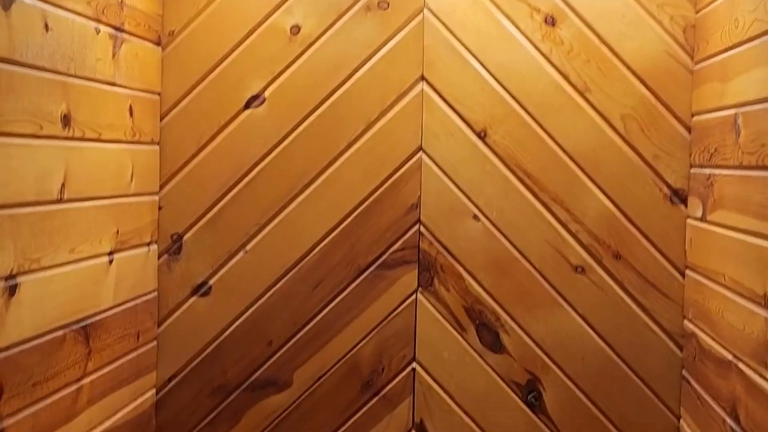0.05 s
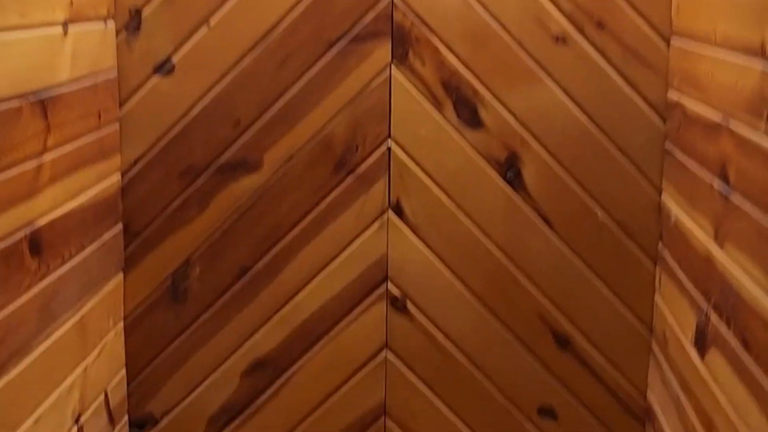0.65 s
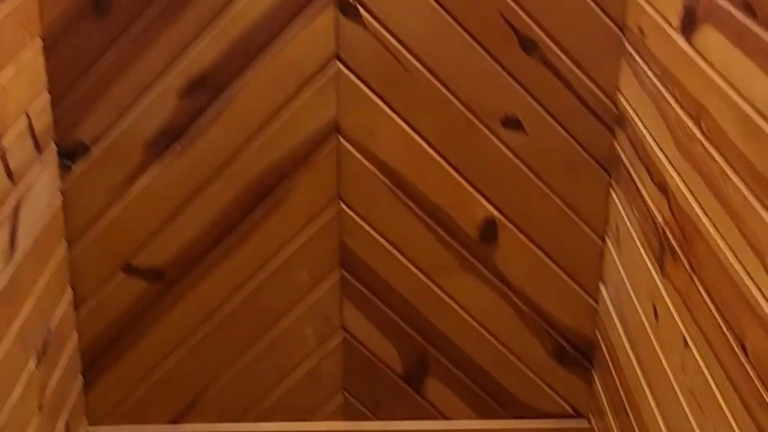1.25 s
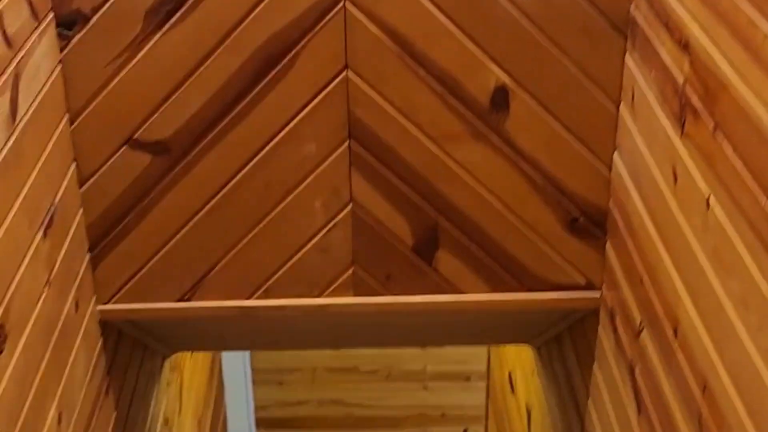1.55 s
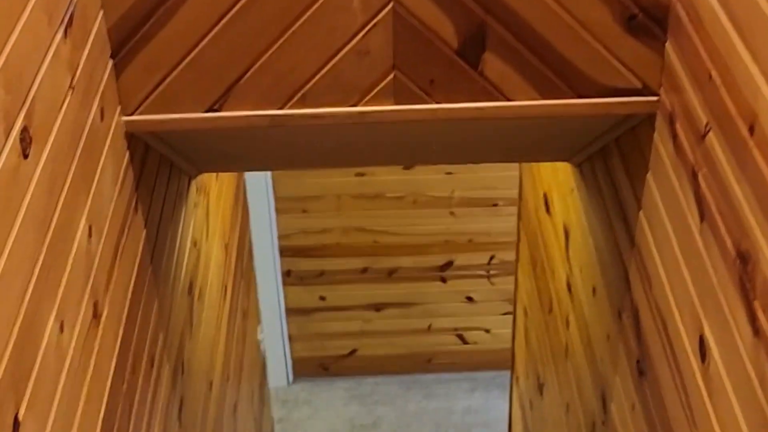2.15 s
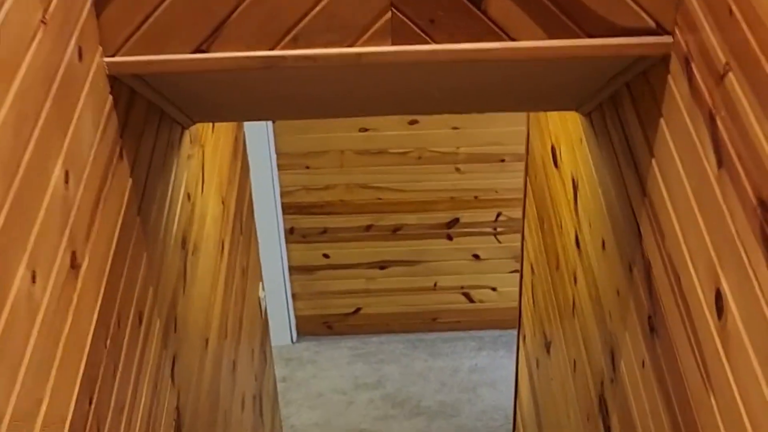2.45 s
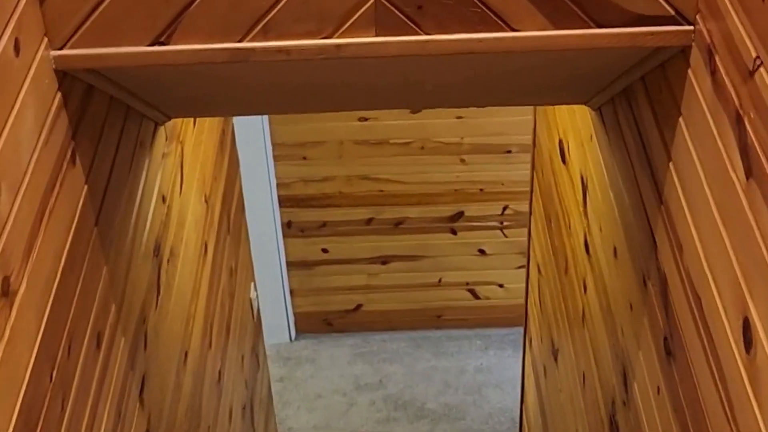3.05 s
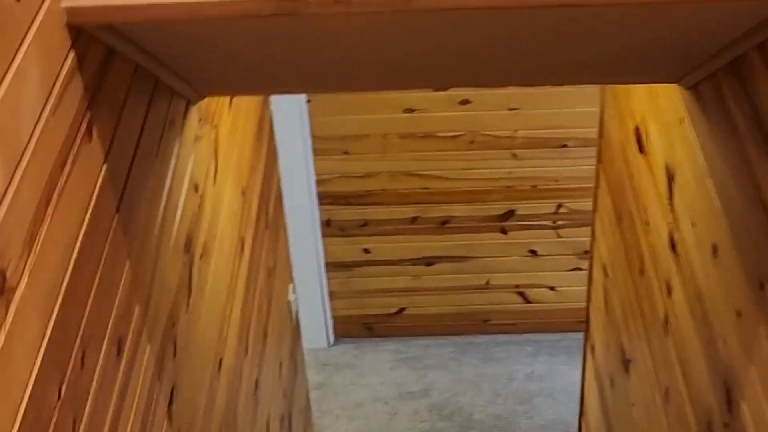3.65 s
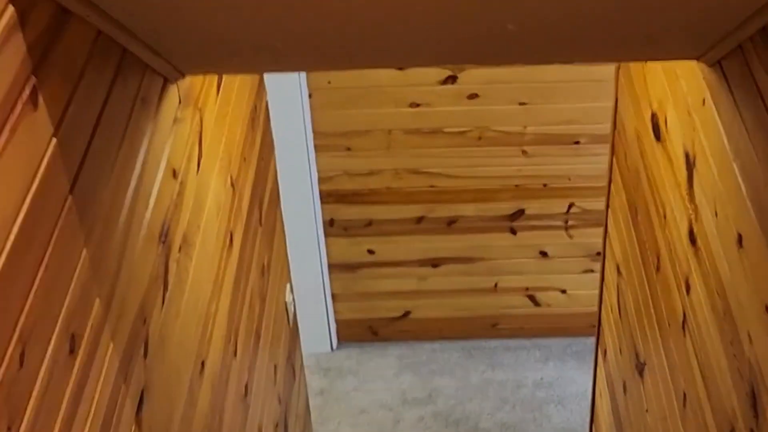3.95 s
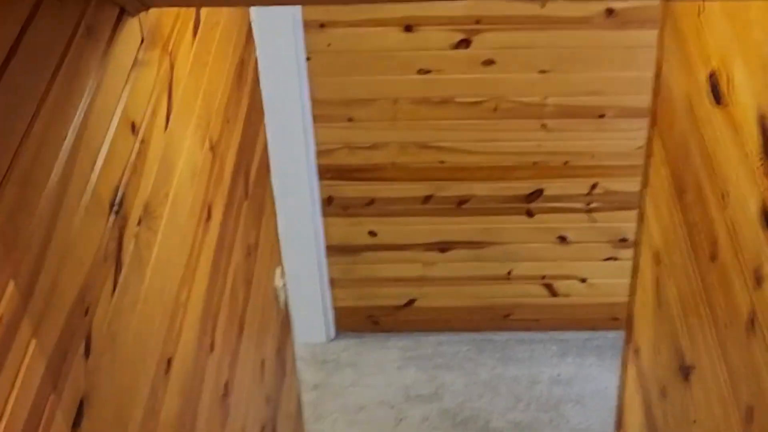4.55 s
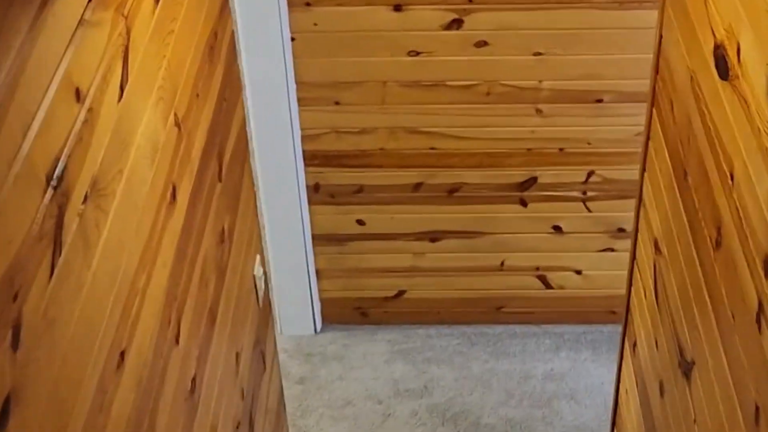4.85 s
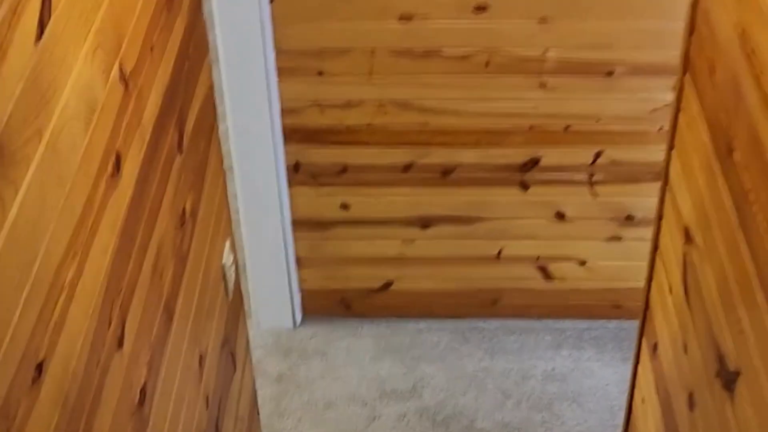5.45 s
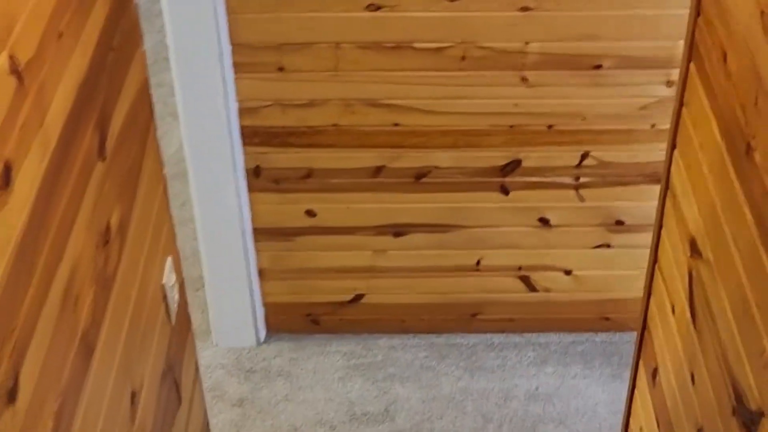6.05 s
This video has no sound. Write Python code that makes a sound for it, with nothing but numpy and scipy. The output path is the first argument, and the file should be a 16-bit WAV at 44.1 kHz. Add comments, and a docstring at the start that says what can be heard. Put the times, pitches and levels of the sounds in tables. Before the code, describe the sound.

Footsteps go down a carpeted wooden staircase in a narrow indoor stairwell, each a low, hollow thud. The first steps are soft and widely spaced, with a few sharp cracks from the boards. Then the steps become heavier and closer together, with light sole scuffs and clothing swishing near the hand-held microphone. A faint low house rumble lies underneath.

```python
"""Footsteps descend a carpeted wooden staircase in a narrow pine-panelled stairwell.
Each impact of heel or toe excites the damped modes of the hollow treads, and soles scuff the carpet.
On the upper steps dry joints slip and crack, the boards resonating and the walls reflecting the sound.
Friction makes clothing swish close to a hand-held phone, over the low rumble of the house."""
import sys
import numpy as np
from scipy import signal
from scipy.fft import rfft, irfft
from scipy.io import wavfile
from scipy.ndimage import uniform_filter1d

SR = 44100
rng = np.random.default_rng(int(sys.argv[2]) if len(sys.argv) > 2 else 0)


def persist_wave(psi):
    """Save psi, clipped to +-1, as 16-bit WAV."""
    counts = np.round(np.clip(psi, -1, 1) * 32767).astype(np.int16)
    wavfile.write(sys.argv[1], SR, np.atleast_2d(counts).T)


N = 277389
TIME = np.arange(N) / SR
AGE = TIME[:SR]  # seconds since an impact

# Levels in the tables are relative: each source adds its own gain.
# footfalls: start_s, thump_db, boom_hz, knock_db, slap_db
FOOTFALLS = [(1.085, -23.5, 92.3, -37.5, -65), (1.83, -37, 127, -46.5, -67), (2.454, -24, 89.7, -34, -55.5),
             (3.142, -32, 115.4, -37.5, -79), (3.273, -19.5, 109.6, -28, -33.5), (3.734, -30, 77, -34, -50),
             (3.775, -41, 108, -33.5, -42.5), (3.805, -25.5, 91.3, -32.5, -48),
             (3.877, -24.5, 92.4, -46, -47), (4.242, -31, 126, -38.5, -47),
             (4.263, -19.5, 107.4, -31, -46.5), (4.377, -22.5, 81, -30.5, -39),
             (4.433, -11, 107.2, -29, -39.5), (4.663, -10.5, 92.6, -21.5, -29),
             (4.816, -25.5, 87.7, -35, -38), (4.961, -33.5, 77, -49, -60), (5.087, -29, 77.5, -39.5, -73),
             (5.218, -28, 74, -42.5, -64), (5.293, -22.5, 70.4, -36, -40.5), (5.356, -19, 72, -32.5, -49),
             (5.602, -12, 101, -23, -32), (5.733, -20.5, 98.6, -27, -34.5), (6.106, -26, 77, -36.5, -62),
             (6.214, -22, 73.5, -66, -60), (6.254, -28.5, 65, -38, -46.5)]
# modes of the hollow staircase: pitch_hz, level_db, t60_s
FRAME_MODES = [(131.9, -5.5, 0.65), (165.6, 0.5, 0.42), (201.5, -3.5, 0.44), (254.6, -4, 0.3),
               (349.6, -7.5, 0.081), (381.5, -6.5, 0.28), (414, -6.5, 0.39), (469, -9, 0.3),
               (550, -12.5, 0.17), (630, -18, 0.49), (787, -10, 0.13)]
# bending modes of the whole flight: pitch_hz, level_db, t60_s
FLIGHT_MODES = [(34, 3, 0.28), (48.2, -4, 0.49), (63.8, 6.5, 0.5)]
# spectrum of the reverberant knock: frequency_hz, level_db
KNOCK_SPECTRUM = [(70, -6.5), (130, 8), (250, 0), (310, -5), (400, -9.5), (550, -9.5), (800, -16),
                  (1300, -32.5), (4000, -54)]
# spectrum of a sole's slap: frequency_hz, level_db
SLAP_SPECTRUM = [(250, -10), (700, 2), (1200, 0.5), (2100, -7.5), (3200, -14), (6000, -18.5), (14000, -41)]
# timber cracks: start_s, level_db, left_minus_right_db, ring_db, echo_db, body_db, bite_db, crisp_db
TIMBER_CRACKS = [(0.343, -48, -3, -17, -1, 0, 0, -21), (0.649, -22, -13.5, -4, -2, -2, 2, -0.5),
                 (0.914, -42.5, -9, -8, 9, 2.5, -7.5, -24), (1.687, -27, -13.5, -32, 0, -16, 4, 0.5),
                 (1.7553, -14, -9, -17, -8.5, -7, 7.5, 0.5), (2.6876, -9.5, -5, 0.5, 3, 6, -3, -7),
                 (2.6922, -25.5, -14, 5, -18, 8, 1, 10.5)]
# resonances of a cracking board: pitch_hz, bandwidth_hz, level_db
BOARD_MODES = [(354, 30, 6), (902, 25, 5), (952, 20, 9), (1009, 20, 5), (2058, 25, 8), (2205, 70, 12),
               (2270, 8, 5), (2828, 25, 6), (3694, 35, 7), (6413, 35, 3), (6789, 35, 3), (8559, 60, 6),
               (11528, 200, 6), (12292, 60, 5)]
# spectrum of a slipping joint: frequency_hz, level_db
SNAP_SPECTRUM = [(300, -11), (1200, -17), (2100, -1), (3000, -25.5), (5000, -8.5), (6600, 3.5), (7600, 2),
                 (9000, -10.5), (11500, -3), (15000, -0.5), (17000, 2.5)]
# spectrum of its wall reflections: frequency_hz, level_db
ECHO_SPECTRUM = [(150, -4), (350, -1), (900, -4), (1400, 0), (2200, -1), (2700, -3.5), (3700, 0.5),
                 (4800, 0), (6600, 3.5), (8000, -7), (9700, -8.5), (11500, -4), (15000, -1.5), (17000, -22)]
# soles brushing the carpet: start_s, level_db, rise_s, centre_hz
SOLE_SCUFFS = [(0.342, -56, 0.0016, 1370), (1.169, -59, 0.018, 3460), (1.395, -54.5, 0.007, 367),
               (1.529, -56, 0.064, 597), (1.742, -43, 0.0078, 385), (2.219, -51, 0.0013, 1510),
               (2.294, -43, 0.012, 453), (2.579, -48, 0.009, 800), (3.229, -47, 0.0098, 1800),
               (4.243, -40, 0.0032, 690), (4.816, -43, 0.0014, 780), (5.585, -40, 0.0093, 570),
               (6.074, -45, 0.0027, 614), (6.120, -41, 0.0018, 790), (6.153, -48, 0.0049, 2080)]
# swishes of clothing: fastest_s, swell_s, fall_s, rub_db, hiss_db
CLOTH_SWISHES = [(0.2, 0.016, 0.22, -68.5, -69.5), (0.51, 0.07, .1, -79, -82),
                 (1.16, 0.12, 0.095, -63, -69), (1.525, 0.024, 0.04, -60, -63),
                 (1.86, 0.29, 0.23, -59.5, -70), (2.048, .045, 0.048, -57.5, -55.5),
                 (2.28, 0.037, .11, -66.5, -66), (2.53, 0.13, 0.17, -58.5, -51.5),
                 (3.0, 0.6, 0.13, -57, -56.5), (3.25, 0.21, 0.21, -54, -46.5),
                 (3.77, .22, 0.16, -54.5, -45), (4.34, 0.17, 0.27, -54.5, -43.5),
                 (4.76, 0.19, 0.17, -54.5, -45.5), (5.33, 0.18, 0.16, -55, -44),
                 (5.75, 0.23, 0.14, -51.5, -46), (6.28, 0.16, .15, -56, -48)]
# soft rub that goes on between swishes: time_s, level_db
RESTING_RUB = [(.15, -82.5), (.7, -72.5), (2.3, -70), (3.5, -71.5), (4.1, -56), (5.05, -63), (6.1, -60)]
# spectrum of rubbing fabric: frequency_hz, level_db
RUB_SPECTRUM = [(200, -4.5), (310, -4), (420, 3), (700, -7.5), (1200, -8.5), (1700, -8.5), (2200, -8),
                (2800, -13), (4600, -12), (6400, -7.5), (7500, -14.5), (9500, -44), (12000, -29),
                (16000, -44)]
# spectrum of its fine hiss: frequency_hz, level_db
HISS_SPECTRUM = [(2000, -14), (7000, -4.5), (9700, -12), (11500, -1.5), (13500, -3), (15300, 0.5),
                 (16200, -20)]
# low shudder of the staircase and the carried phone: time_s, level_db
SHUDDER_LEVELS = [(0, -59), (.9, -58), (1.2, -49.5), (1.8, -50), (3.9, -50.5), (5.3, -43), (6.29, -40)]
# spectrum of that shudder: frequency_hz, level_db
SHUDDER_SPECTRUM = [(20, -0.5), (45, -0.5), (60, -6), (78, -8), (105, 8), (160, -7.5), (260, -19.5),
                    (450, -27), (900, -53.5)]
# spectrum of the house rumble: frequency_hz, level_db
HOUSE_SPECTRUM = [(20, -17), (40, -5), (58, 1), (78, -12), (103, -1), (134, -6), (200, -21), (300, -23),
                  (700, -38.5), (2100, -37), (2600, -56), (6300, -44.5), (9000, -74), (16000, -62)]
# stereo width between the two microphone ports: frequency_hz, side_minus_mid_db
STEREO_WIDTH = [(60, -18), (125, -19.5), (250, -9), (500, -5.5), (1200, 3), (2400, -1), (5000, 1),
                (8000, -3.5), (15000, -17.5)]


def footsteps():
    """Impact excitation: a foot sets tread, flight and hollow frame vibrating in their normal modes."""
    out = np.zeros((2, N))
    for start_s, thump_db, boom_hz, sag_db, knock_db, slap_db in impacts():
        # a hard contact slaps louder and reaches higher modes than a soft one
        tilt_db = 0.22 * (slap_db - knock_db + 14.5)
        tread = -undb(thump_db + 4.5) * mode(boom_hz, t60=0.18, rise=0.014)
        sag = undb(sag_db) * struck_modes(FLIGHT_MODES, rise=0.0088)
        frame = undb(knock_db - 3.5) * struck_modes(FRAME_MODES, rise=0.0017, tilt_db=tilt_db)
        slap = undb(slap_db + 10.5) * noise(SLAP_SPECTRUM)[0] * fade(t60=0.016, rise=0.00067)
        # reverberation arrives from all sides and lasts longer in the bass
        low_echo = undb(knock_db) * noise(KNOCK_SPECTRUM, tilt_db=tilt_db) * fade(t60=0.34, rise=0.0023)
        high_echo = undb(slap_db - 0.5) * noise(SLAP_SPECTRUM) * fade(t60=0.21, rise=0.0018)
        add(out, start_s, from_below(tread + sag + frame + slap) + low_echo + high_echo)
    return out


def impacts(settle_s=0.058, light_touch_db=-32.5, usual_thump_db=-24.5):
    """Weight transfer: each footfall bends the flight, and all but the lightest settle with a bump."""
    settle_thump_db, settle_knock_db, settle_slap_db = -31, -46, -68
    for start_s, thump_db, boom_hz, knock_db, slap_db in FOOTFALLS:
        shudder_db = np.interp(start_s, *np.transpose(SHUDDER_LEVELS))
        sag_db = shudder_db + 2.5 + 0.22 * (thump_db - usual_thump_db)
        yield start_s, thump_db, boom_hz, sag_db, knock_db, slap_db
        bump_s = start_s + settle_s
        if bump_s < TIME[-1] and thump_db > light_touch_db:
            yield bump_s, settle_thump_db, boom_hz, sag_db + 2.5, settle_knock_db, settle_slap_db


def struck_modes(modes, rise, tilt_db=0):
    """Modal superposition: a random striking point varies each mode; tilt_db is per octave."""
    out = np.zeros(SR)
    for hz, db, t60 in modes:
        share, shift = rng.standard_normal(2)
        gain = undb(db + 1.36 * share + tilt_db * np.log2(hz / 280))
        out += gain * np.sign(shift) * mode(hz * (1 + 0.0092 * shift), t60, rise)
    return out


def from_below(sound, lag_s=0.00045):
    """Path difference: sound from the feet reaches the left microphone port later than the right."""
    delayed = np.interp(AGE - lag_s, AGE, sound, left=0)
    return np.array([delayed, sound]) * pan(0.23)


def timber_cracks():
    """Stick-slip: a joint lets go with a snap, followed by dense reflections between the walls."""
    out = np.zeros((2, N))
    for start_s, level_db, pan_db, ring_db, echo_db, body_db, bite_db, crisp_db in TIMBER_CRACKS:
        snap = noise(SNAP_SPECTRUM)
        snap *= fade(t60=0.0064, rise=0.00081) + 0.052 * fade(t60=0.092, rise=0.00096)
        echo = noise(ECHO_SPECTRUM)
        echo *= fade(t60=0.12, rise=0.015) + 0.25 * fade(t60=0.38, rise=0.0077)
        crack = undb(8.5) * snap * pan(pan_db) + undb(echo_db - 6.5) * echo * pan(0.15 * pan_db)
        coloured = board_resonance(crack, ring_db, body_db, bite_db, crisp_db)
        add(out, start_s, undb(level_db) * coloured[:, :SR // 2])
    return out


def board_resonance(sound, ring_db, body_db, bite_db, crisp_db):
    """Resonant filtering by a board; a longer slip has more body, a faster one more bite and top."""
    bin_hz = np.arange(SR // 2 + 1)
    peaks = sum(undb(db + ring_db) / (1 + 2j * (bin_hz - hz) / width) for hz, width, db in BOARD_MODES)
    slip_tone = gains([(400, 0.0035), (800, body_db), (1500, 0), (4800, 0), (6800, bite_db),
                       (8300, 0), (11500, crisp_db)], size=SR)
    return irfft(rfft(sound) * (1 + peaks) * slip_tone, SR)


def scuffs():
    """Sliding friction: a sole on carpet gives a pulse of band noise with a faint reverberant tail."""
    out = np.zeros((2, N))
    for start_s, level_db, rise, hz in SOLE_SCUFFS:
        rub = noise([(hz / 4, -24), (hz, 0), (hz * 4, -27), (hz * 16, -55)])
        pulse = AGE / rise * np.exp(1 - AGE / rise)
        tail = 0.14 * fade(t60=0.37, rise=rise)
        add(out, start_s, undb(level_db) * rub * (pulse + tail))
    return out


def clothing():
    """Friction noise: fabric rubs on fabric, grainy from the weave and hissing when it slides fast."""
    rub_gain, hiss_gain = sliding_gains()
    rub = undb(6) * rub_gain * noise(RUB_SPECTRUM, size=N) * pan(-0.47)
    hiss = undb(-2.5) * hiss_gain * noise(HISS_SPECTRUM, size=N) * pan(-3.5)
    grain = undb(0.55 * wander(rate_hz=35) + 1.07 * wander(rate_hz=400))
    return grain * (rub + hiss)


def sliding_gains(steepness=2.41):
    """Incoherent addition: swishes sum in power, the amplitude of each following its sliding speed."""
    rest = undb(np.interp(TIME, *np.transpose(RESTING_RUB)))
    rub_power, hiss_power = rest ** 2, (rest * undb(-24)) ** 2
    for fastest_s, swell_s, fall_s, rub_db, hiss_db in CLOTH_SWISHES:
        from_peak = np.maximum((fastest_s - TIME) / swell_s, (TIME - fastest_s) / fall_s)
        speed = np.exp(-from_peak.clip(0, 10) ** steepness)  # a bell with a flattened top
        rub_power += (undb(rub_db) * speed) ** 2
        hiss_power += (undb(hiss_db) * speed) ** 2
    return np.sqrt([rub_power, hiss_power])


def house_rumble(rumble_db=-55):
    """Structure-borne noise: a steady rumble, and an uneven shudder that grows on the lower flight."""
    shudder_db = np.interp(TIME, *np.transpose(SHUDDER_LEVELS)) + 2 * wander(rate_hz=12)
    shudder = undb(shudder_db) * noise(SHUDDER_SPECTRUM, size=N)
    return undb(rumble_db) * noise(HOUSE_SPECTRUM, size=N) + shudder


def mode(hz, t60, rise):
    """Damped oscillation at one natural frequency."""
    return np.sin(2 * np.pi * hz * AGE) * fade(t60, rise)


def fade(t60, rise):
    """Exponential decay of 60 dB in t60 seconds, with an onset time constant of rise seconds."""
    return (1 - np.exp(-AGE / rise)) * undb(-60 * AGE / t60)


def noise(spectrum, size=SR, tilt_db=0):
    """Partial coherence: coloured stereo noise of rms 1, alike in the bass; tilt_db is per octave."""
    mid, side = rfft(rng.standard_normal((2, size)))
    width = gains(STEREO_WIDTH, size)
    octaves = np.log2((np.arange(size // 2 + 1) * SR / size + 20) / 4000)
    pair = (mid + np.array([[1], [-1]]) * width * side) / np.hypot(1, width)
    coloured = irfft(pair * gains(spectrum, size) * undb(tilt_db * octaves), size)
    return coloured / np.sqrt(np.mean(coloured ** 2))


def gains(spectrum, size):
    """Spectral envelope: the gain at each transform bin, interpolated over log frequency."""
    hz, db = np.transpose(spectrum)
    bin_hz = np.arange(size // 2 + 1) * SR / size
    return undb(np.interp(np.log(bin_hz + 1), np.log(hz), db))


def wander(rate_hz):
    """Random modulation, smoothed, with a spread near 1."""
    hold = int(SR / rate_hz)
    held = np.repeat(rng.standard_normal(N // hold + 1), hold)
    return uniform_filter1d(held, hold)[:N]


def pan(db):
    """Level difference, left minus right, as a pair of gains."""
    return undb(np.array([[db], [-db]]) / 2)


def undb(db):
    """Amplitude ratio of a level in decibels."""
    return 10 ** (np.asarray(db) / 20)


def add(out, start_s, sound):
    """Superposition of a sound on the mix from start_s."""
    i = int(start_s * SR)
    out[:, i:i + sound.shape[1]] += sound[:, :N - i]


def scene():
    """Linear superposition of all sources in the stairwell."""
    return footsteps() + timber_cracks() + scuffs() + clothing() + house_rumble()


def record(dry):
    """Band limiting: the phone cuts the top with a steep low-pass filter."""
    cutoff_hz = 15850
    return signal.sosfilt(signal.ellip(10, .2, 70, cutoff_hz, fs=SR, output="sos"), dry)


dry = scene()
out = record(dry)
persist_wave(out)
```